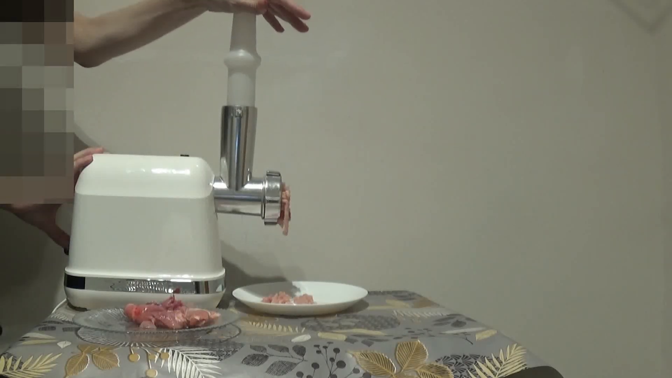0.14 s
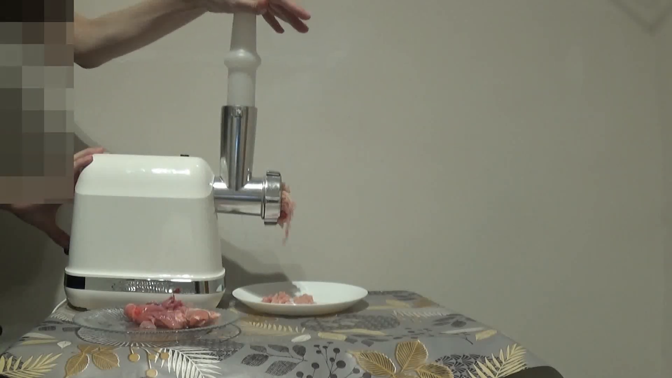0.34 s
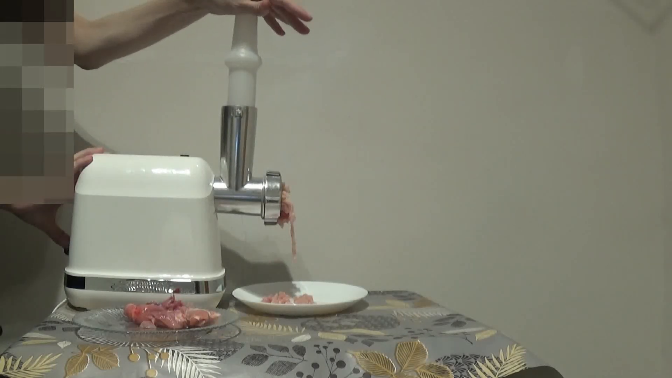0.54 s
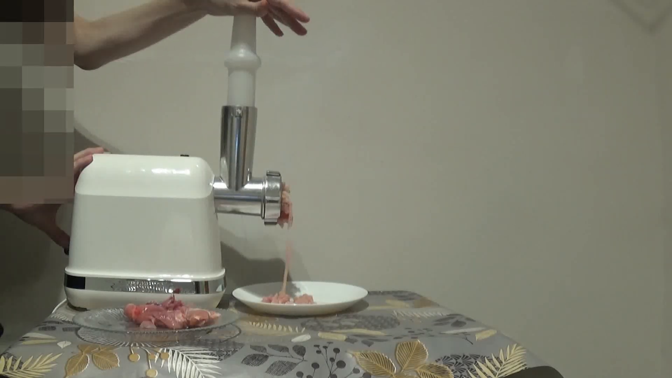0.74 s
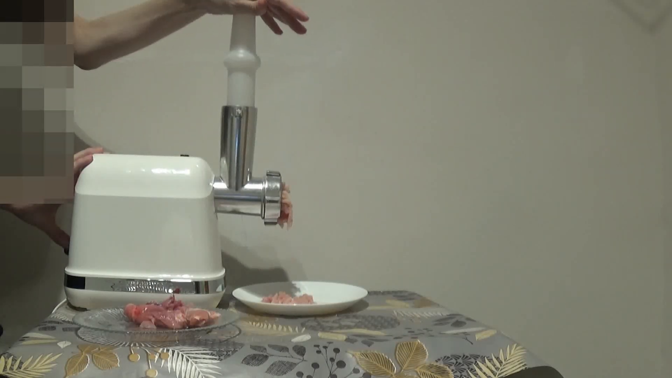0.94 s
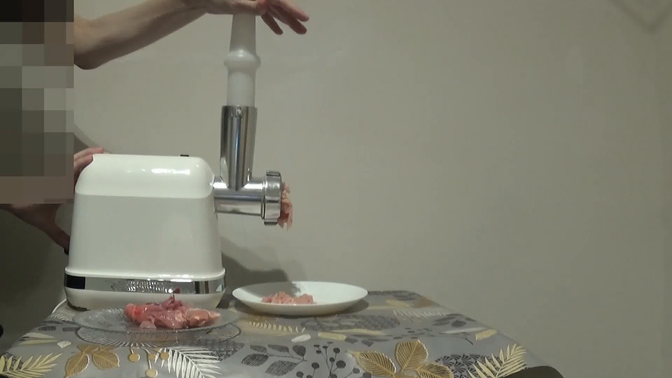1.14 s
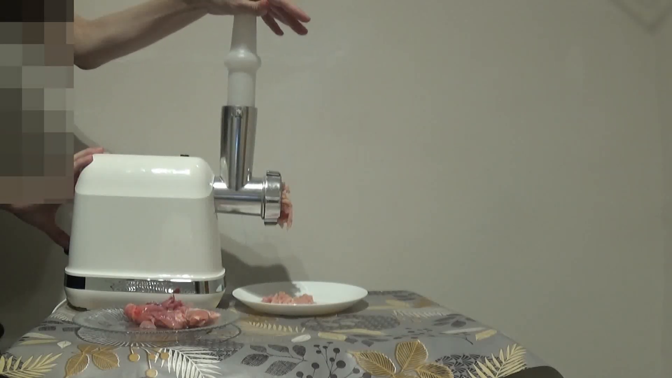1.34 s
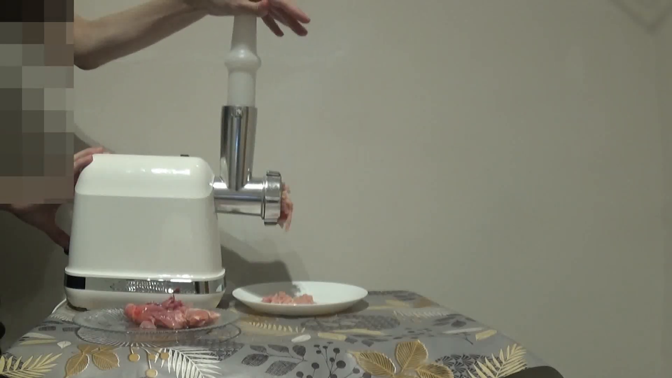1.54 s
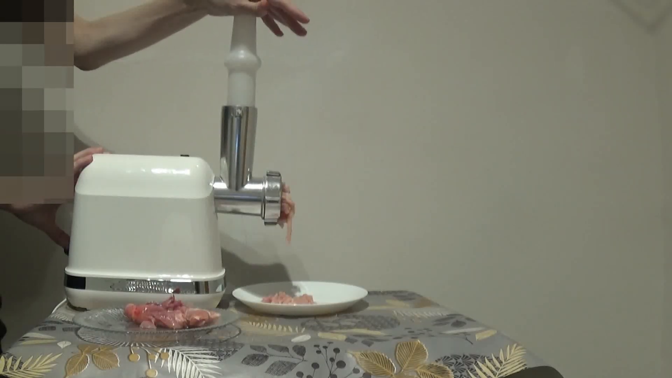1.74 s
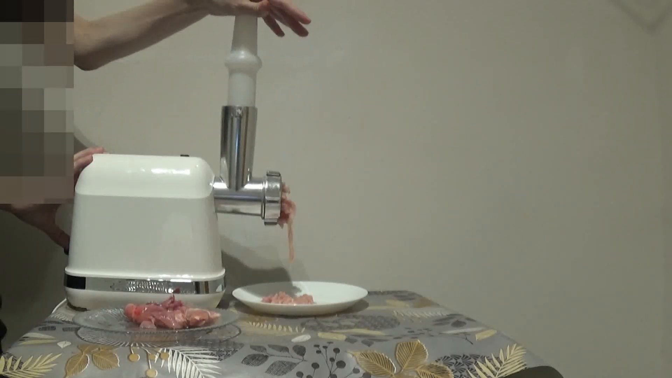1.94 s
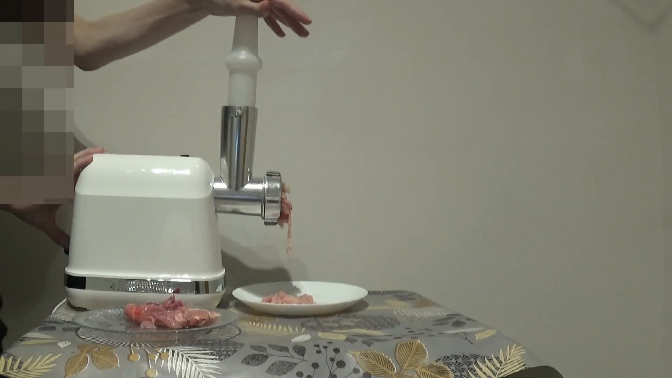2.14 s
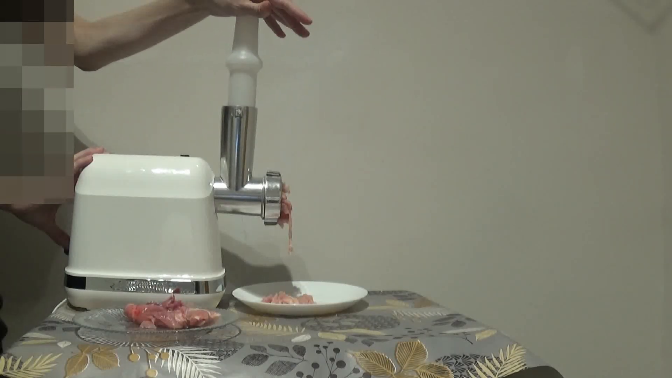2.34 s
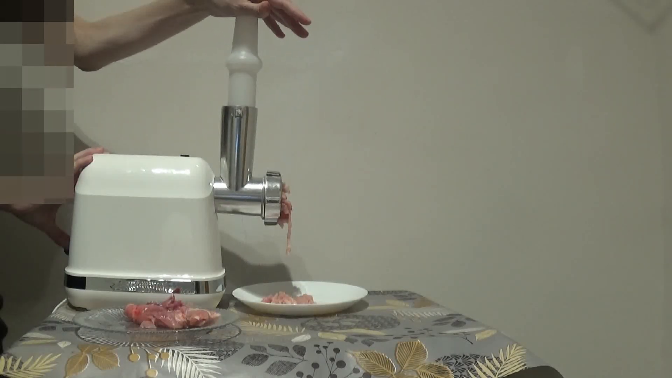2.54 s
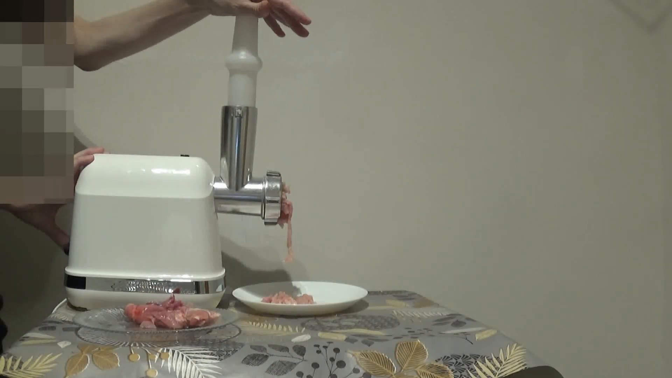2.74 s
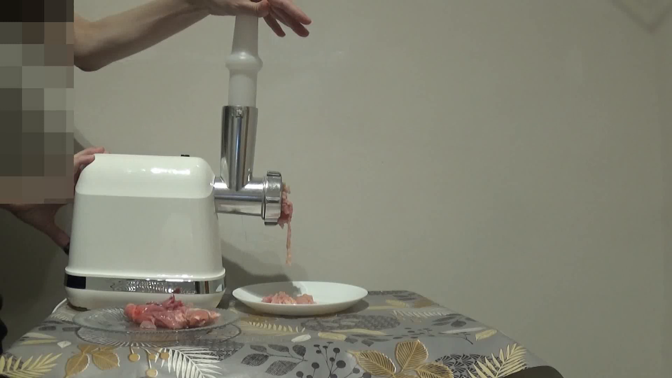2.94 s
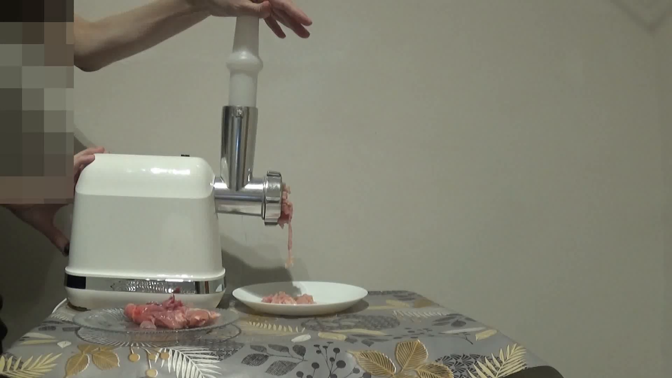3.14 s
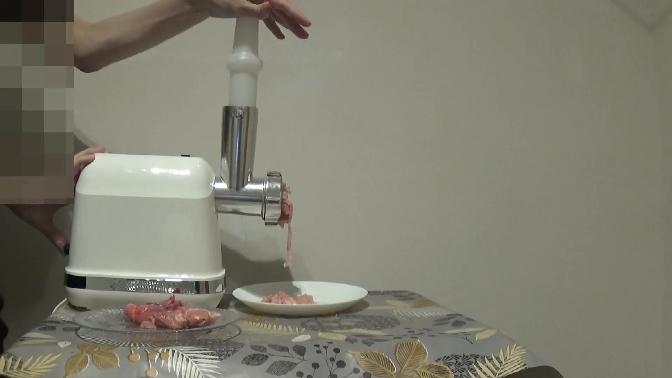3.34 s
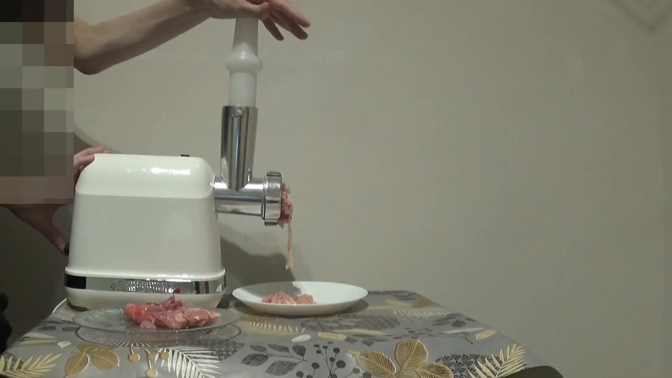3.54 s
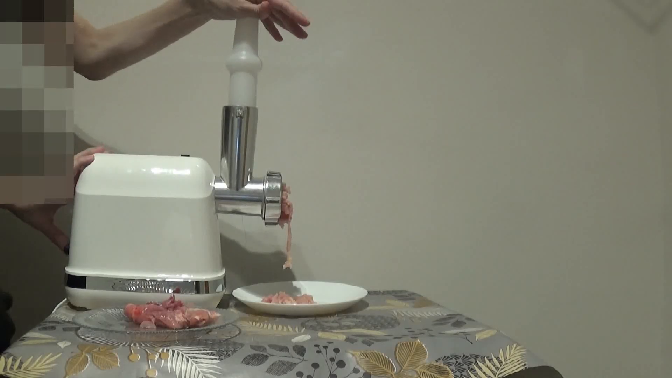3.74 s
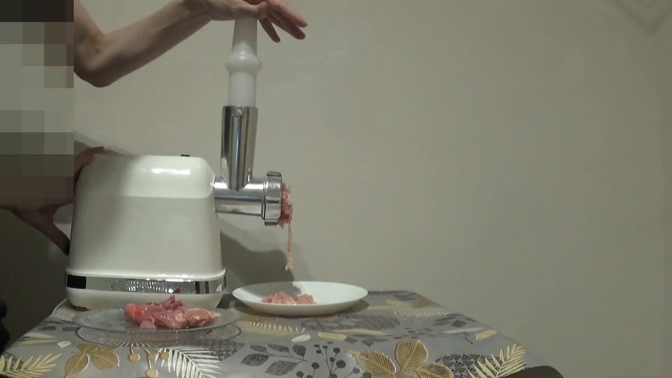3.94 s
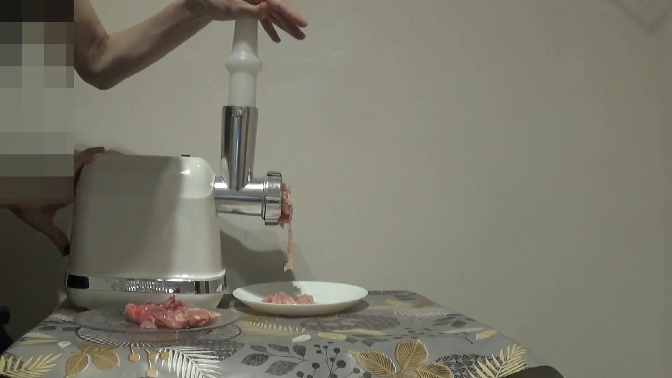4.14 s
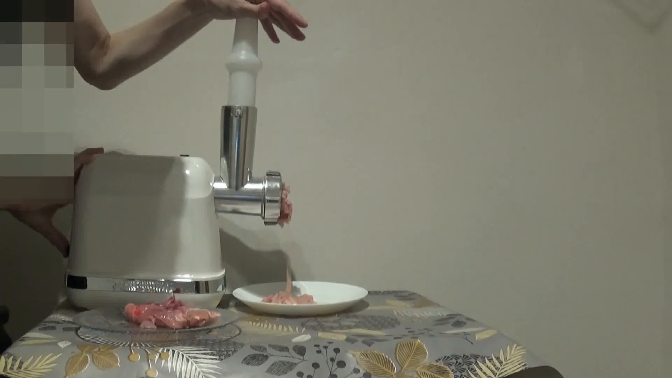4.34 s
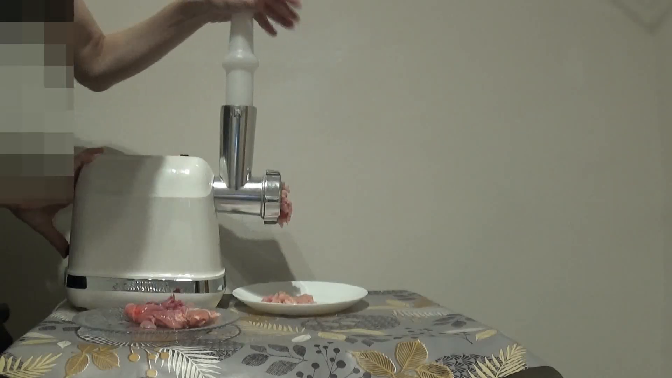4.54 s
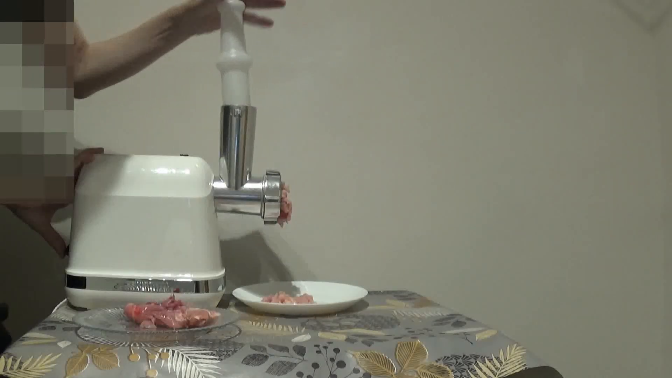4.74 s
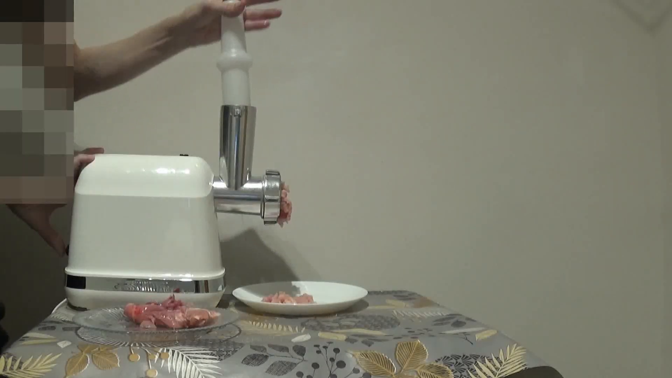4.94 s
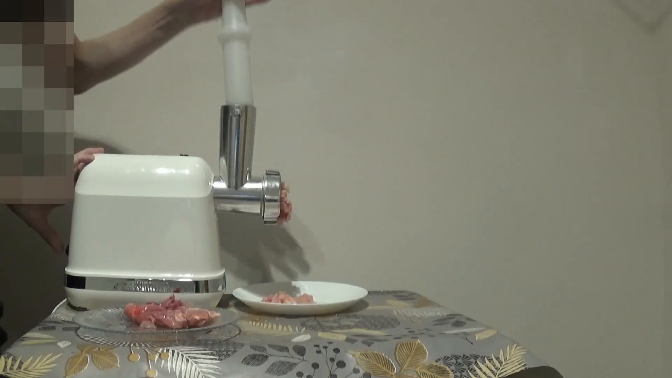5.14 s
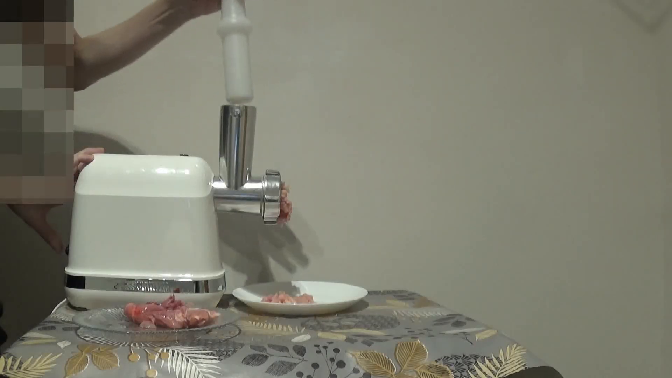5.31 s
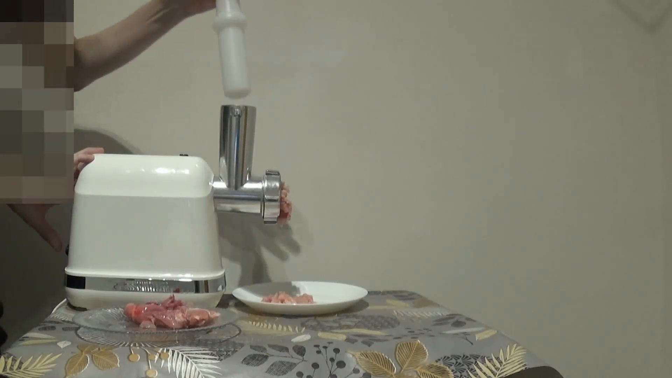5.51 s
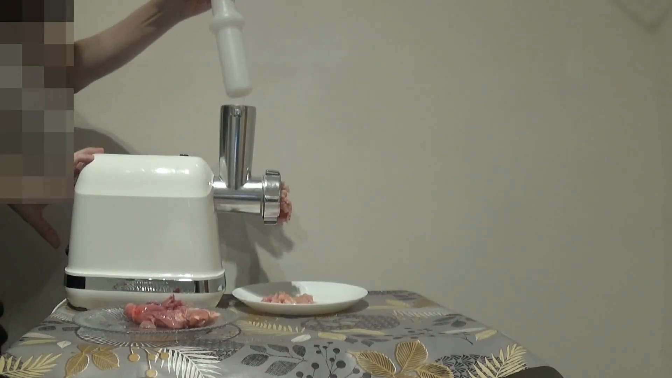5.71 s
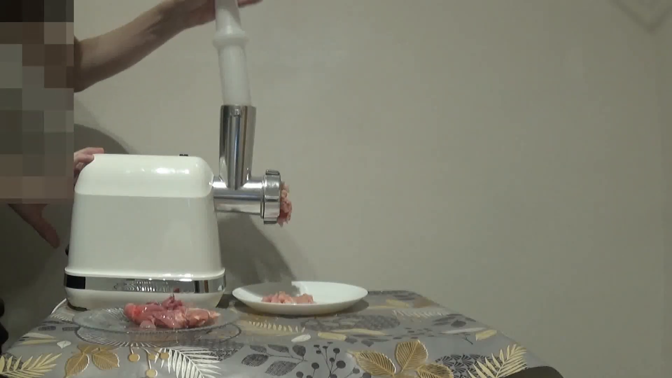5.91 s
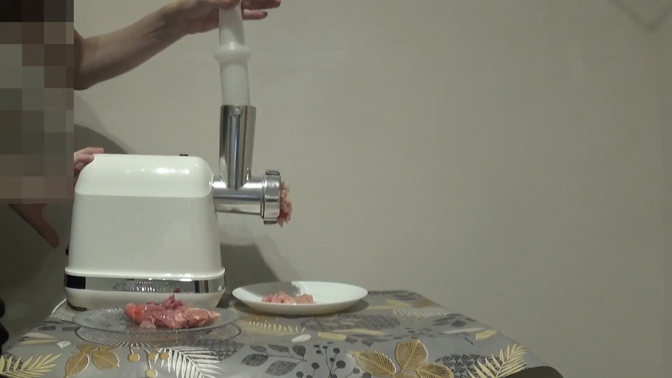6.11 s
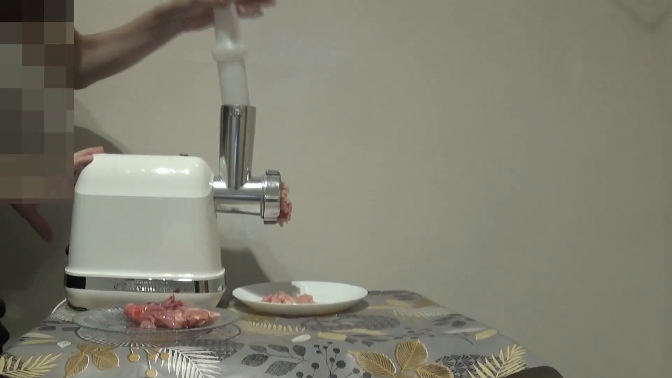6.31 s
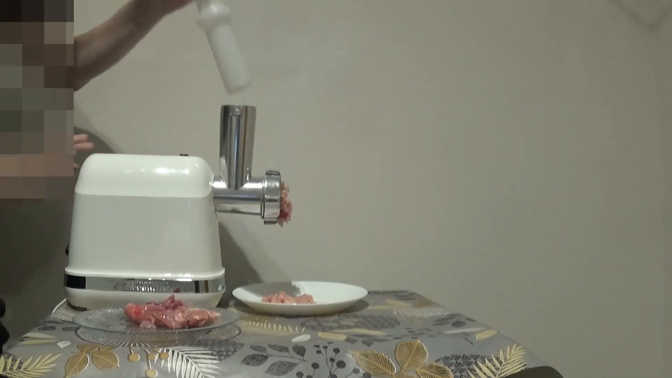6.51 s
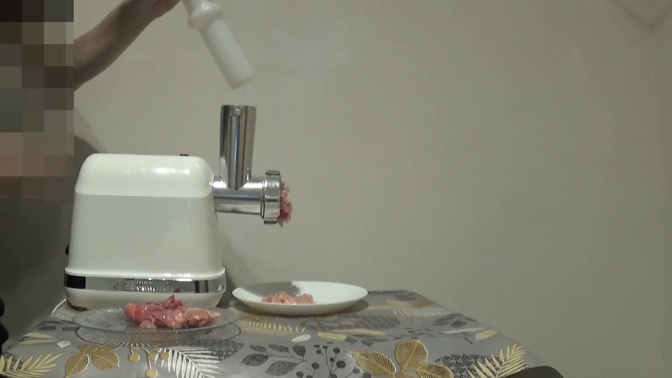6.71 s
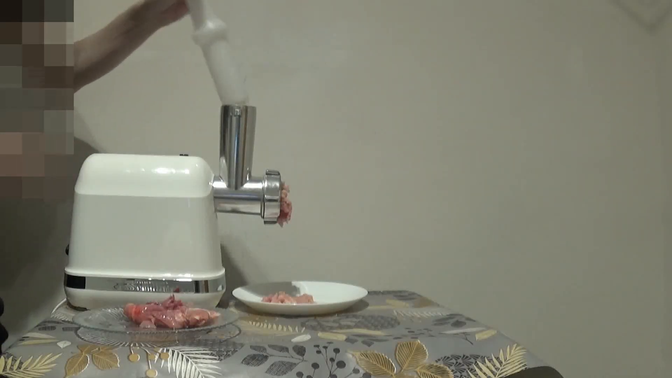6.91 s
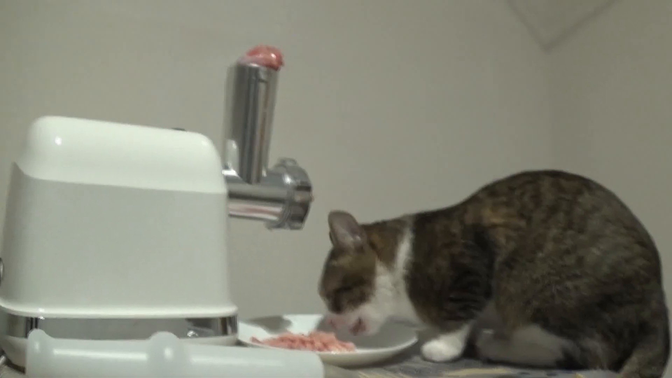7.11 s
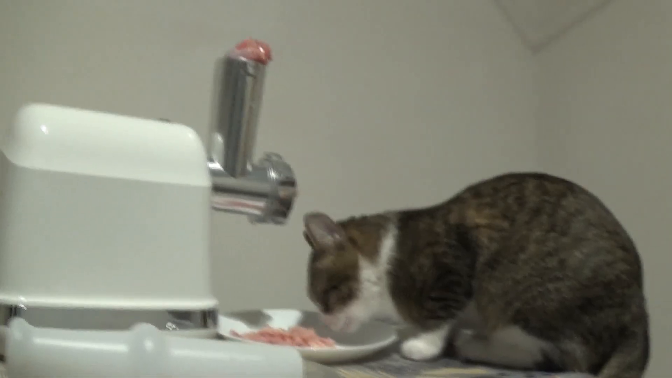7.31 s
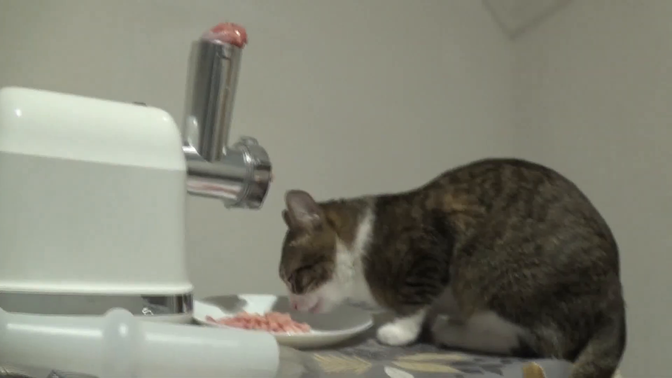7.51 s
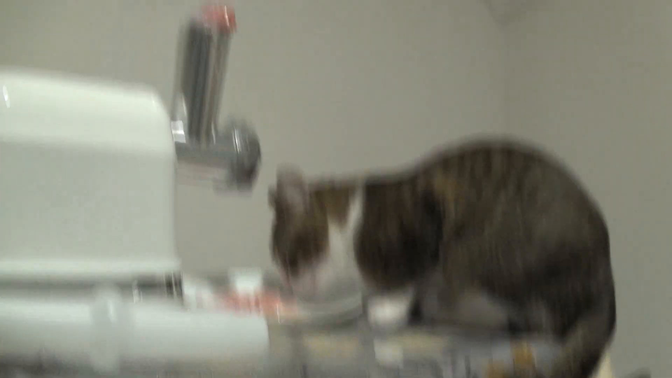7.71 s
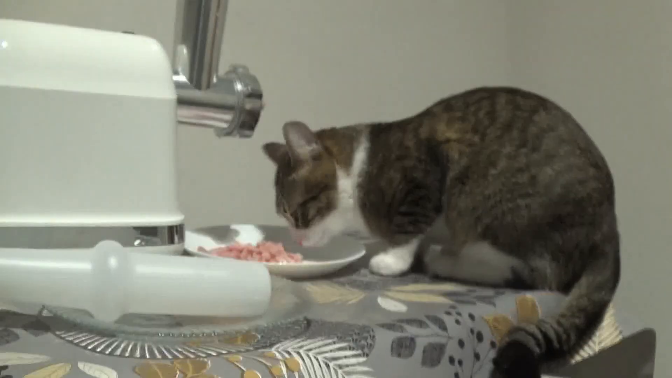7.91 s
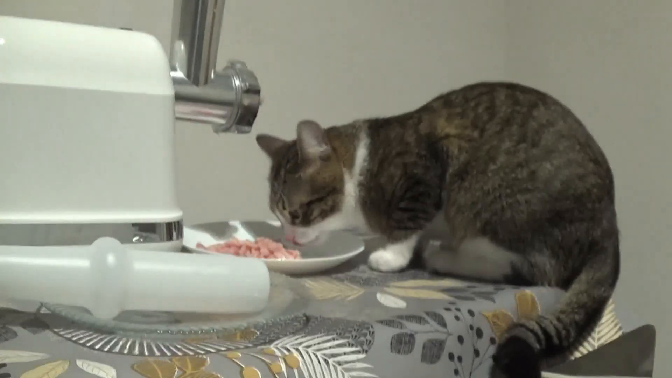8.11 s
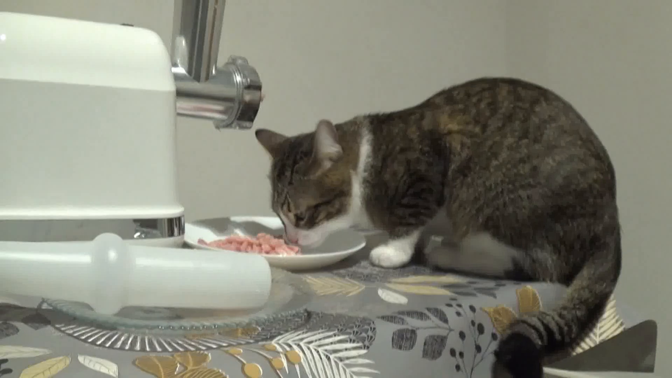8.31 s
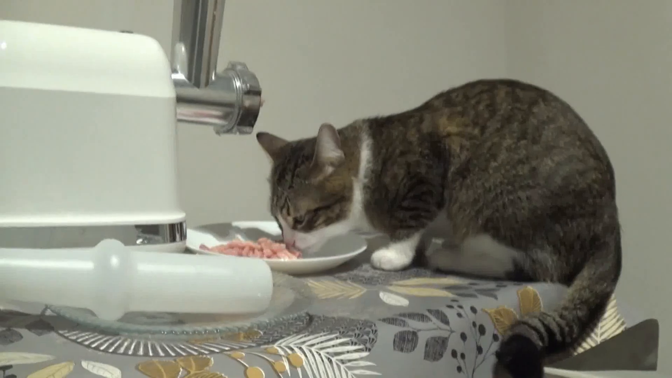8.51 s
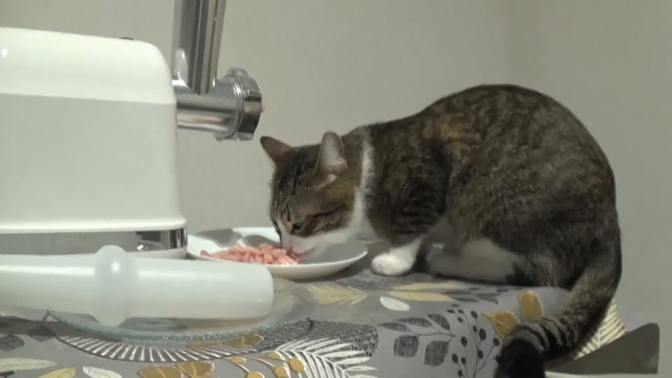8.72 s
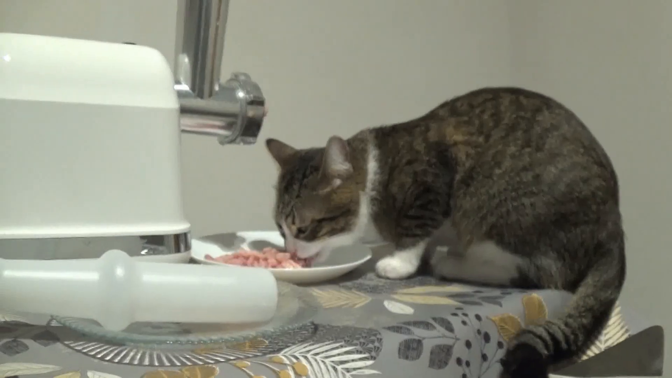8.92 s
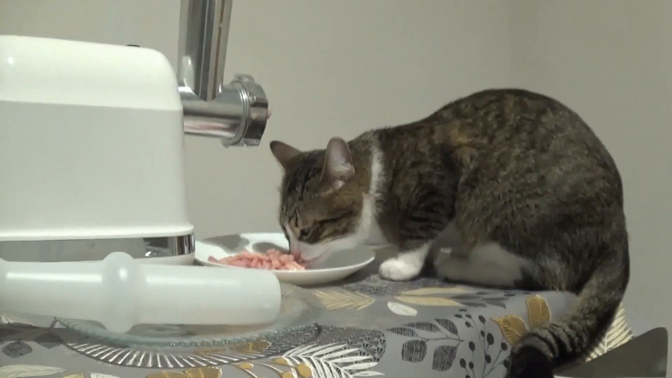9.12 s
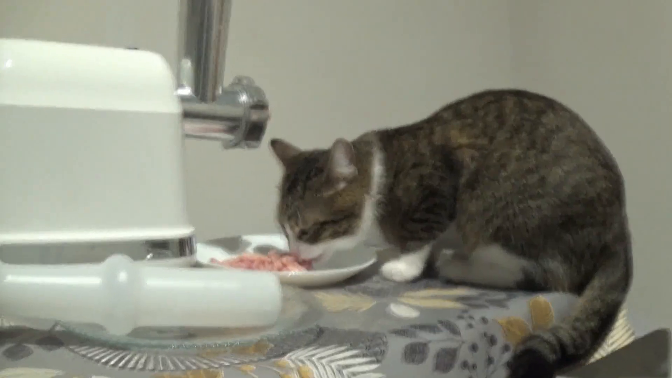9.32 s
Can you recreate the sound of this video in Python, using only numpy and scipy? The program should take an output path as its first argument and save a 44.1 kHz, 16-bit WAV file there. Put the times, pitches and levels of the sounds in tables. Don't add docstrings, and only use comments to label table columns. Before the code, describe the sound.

A rough grinder motor fills the first four seconds, its tone easing slightly as the meat load lightens, then falls in pitch and rattles to a halt. One hollow plastic knock with small rebounds, dry scraping and light rim taps follow in the quiet kitchen. A short dead gap cuts to close, irregular cat eating: wet smacks, crisp saliva clicks, a pause, plate nudges on cloth and more eager licking.

```python
import sys
import numpy as np
from scipy import signal
from scipy.fft import rfft, irfft, next_fast_len
from scipy.io import wavfile
from scipy.ndimage import map_coordinates

SR = 44100
rng = np.random.default_rng(int(sys.argv[2]) if len(sys.argv) > 2 else 0)


def convert_level_to_amplitude(level_db):
    exponent = np.asarray(level_db, float) / 20
    return 10 ** exponent


def master(y):
    cut = np.clip(np.atleast_2d(y).T, -1, 1)
    pcm = np.round(cut * 32767)
    wavfile.write(sys.argv[1], SR, pcm.astype(np.int16))


N = 417186
TIME = np.arange(N) / SR
GEAR = 16 / 13
FREE_TURNS = 323.4
SILENT_S, BACK_S = 7.002, 7.062

# (time [s], peak [dB], mouth resonance [Hz], edge [dB])
SMACKS = [(7.095, -31.5, 1000, -9), (7.193, -49, 800, -6), (7.21, -35.5, 1300, -4.5),
          (7.26, -48, 2300, -10), (9.304, -44.5, 1000, -4), (7.375, -37.5, 800, -9), (7.411, -43, 640, -4),
          (7.446, -48, 880, -12), (7.487, -42.5, 760, -3), (7.533, -42, 950, 0), (7.621, -34.5, 850, -13),
          (7.648, -30, 680, 2), (7.665, -24, 800, -3), (7.6856, -24.5, 1670, -10), (7.763, -44, 646, -12),
          (7.841, -46, 716, -6), (7.88, -49, 751, -8), (7.938, -36, 884, -5), (8.256, -37.5, 1130, -2),
          (8.353, -44, 760, -10), (8.394, -32, 1850, -5), (8.456, -42, 1200, 5), (8.522, -37, 646, -8),
          (8.588, -43, 700, 4), (8.721, -48, 2050, -4), (8.756, -45, 762, -11), (9.014, -44, 800, -6),
          (9.226, -37.5, 950, -1), (9.24, -38, 1570, 5.5), (9.312, -38, 710, -8), (8.146, -50, 1300, -3),
          (8.67, -50, 1100, -3), (9.417, -45, 1500, -4)]


def grinder():
    # (time [s], level [dB])
    gear_levels = [(0, -17.5), (4.2, -17.5), (4.3, -15.5), (4.46, -15.5), (4.75, -15.5), (5.08, -16.5),
                   (5.25, -19.5), (5.278, -18), (5.35, -23.5), (5.41, -29), (5.48, -39.5), (5.55, -52),
                   (5.72, -71.5)]
    # (time [s], first low tone [dB], second low tone [dB], brush contact [dB])
    thrust = [(0, 0.5, -1.5, -1), (.5, -3, -1.5, 0.5), (.7, 1, 0.5, -2.5), (1.25, 2, 3, -4.5),
              (1.45, 0, -0.5, 2.5), (1.9, 1, -0.5, 2.5), (2.5, -1, 0, 1.5), (3.1, -1, 0, 2),
              (3.5, 0, 0.5, 1.5), (3.7, -0.5, -5.5, -3), (4.0, -1, -1.5, 0), (4.2, -2.5, 2.5, -3.5),
              (4.3, -2, -1, 2), (4.4, 2, -1.5, 0)]
    # (frequency [Hz], level difference [dB])
    lean = [(60, 0.15), (170, 0.0), (510, 1.6), (1480, 0), (4310, 0.24), (12600, 1)]
    speed, load, coasting = armature()
    speed = speed * (1 + .0008 * wobble(14))
    turns = np.cumsum(speed) / SR
    rattle_db, = curves(gear_levels, outside=-120)
    *low_db, contact_db = curves(thrust)
    sound = housing_noise(speed, turns, coasting, rattle_db)
    sound += gear_tones(speed, turns, load, coasting, rattle_db, low_db)
    sound += brushes(speed, turns, coasting, contact_db)
    return filtered(sound, lambda f: convert_level_to_amplitude(along(lean, f) * [[.5], [-.5]]))


def armature():
    # (time [s], load [share])
    meat = [
        (0, 1),
        (.7, 1),
        (1.25, .8),
        (1.5, 0),
        (3.4, 0),
        (3.9, -.3),
        (4.25, -.3),
        (4.31, -.1),
    ]
    off_s, release_s = 4.25, .06
    sag_turns, creep_turns_per_s = 3.6, .45
    drag_per_s, friction_turns = .7614, 200
    load = np.interp(TIME, *np.transpose(meat))
    driven = FREE_TURNS + creep_turns_per_s * np.minimum(TIME, off_s) - sag_turns * load
    since = np.maximum(TIME - off_s, 0)
    slowing = (driven + friction_turns) * np.exp(-drag_per_s * since) - friction_turns
    return np.maximum(slowing, 1), load, np.minimum(since / release_s, 1)


def housing_noise(speed, turns, coasting, rattle_db):
    # (frequency [Hz], density [dB per Hz])
    rattle_shape = [(290, -47), (500, -9), (727, -2), (850, -1), (1220, 3), (1540, -3), (2330, 1.5),
                    (2900, -6), (3640, -11), (3960, -11), (6000, -15.5), (7800, -34.5), (13200, -120)]
    # (frequency [Hz], density [dB per Hz])
    hiss_shape = [(1760, -31.5), (3000, 0), (3780, -7), (4180, -6.5), (5170, -9), (7380, -8.5), (7560, -9),
                  (8660, -7), (9520, -7.5), (11100, -10.5), (12400, -19), (16100, -46.5), (22000, -120)]
    # (frequency [Hz], width [Hz], gain [dB])
    housing = [(1116, 30, 1), (1254, 27, 3.5), (1675, 153, 6.5), (1980, 21, 6.5), (2300, 17, 4),
               (3757, 53, 10), (6270, 140, 4), (9500, 420, 4)]
    # (frequency [Hz], density [dB per Hz])
    rumble_shape = [(130, -57.5), (220, -21.5), (427, -3.5), (580, -7), (611, -16.5), (638, -18),
                    (700, 4.5), (910, -21), (1540, -120)]
    # (frequency [Hz], density [dB per Hz])
    draught_shape = [(15, -49.5), (25, -7.5), (124, -23.5), (166, 4), (240, -4.5), (310, -33), (530, -120)]
    fan_db, fan_off_db, fan_db_per_decade, fan_slowest = -4.5, -2, 14.5, 30
    table_db, shudder_turns, shudder_slowest = -18.5, 76, 17.5
    dull_hz, dulling = 2300, 0.5
    chatter_hz, chatter_width_hz, chatter_db = 1550, 700, -9.5

    def shell(f):
        return 1 + sum((convert_level_to_amplitude(db) - 1) * abs(resonance(f, hz, width)) ** 2 for hz, width, db in housing)

    hiss_db = rattle_db + fan_db + fan_off_db * coasting
    hiss_db += fan_db_per_decade * np.log10(np.maximum(speed, fan_slowest) / FREE_TURNS)
    hiss_db += .08 * np.minimum(rattle_db + 16.5, 0)
    shudder = (shudder_turns / np.maximum(speed, shudder_slowest)) ** 2
    rumble_db = rattle_db + table_db + 10 * np.log10(1 + shudder)

    rattle = unit(room(rush(lambda f: convert_level_to_amplitude(along(rattle_shape, f)) * shell(f), grain_db=-0.86), -9.0))
    hiss = unit(room(rush(lambda f: convert_level_to_amplitude(along(hiss_shape, f)) * shell(f), grain_db=1.5), -28.5))
    bright_part = filtered(rattle, lambda f: 1 / (1 + (dull_hz / (f + 1)) ** 4))
    rattle = rattle - bright_part * (1 - convert_level_to_amplitude(dulling * np.minimum(rattle_db + 13.5, 0)))
    hiss = hiss * (1 + 0.24 * np.sin(2 * np.pi * turns))
    sound = convert_level_to_amplitude(rattle_db - 0.75) * rattle + convert_level_to_amplitude(hiss_db + 0.63) * hiss

    chatter = rush(lambda f: abs(resonance(f, chatter_hz, chatter_width_hz)) ** 2, grain_db=2.5)
    sound += coasting * (1 - speed / FREE_TURNS) * convert_level_to_amplitude(rattle_db + chatter_db) * chatter
    sound += convert_level_to_amplitude(rumble_db + 1.0) * rush(lambda f: convert_level_to_amplitude(along(rumble_shape, f)))
    sound += convert_level_to_amplitude(0.87 * hiss_db - 44.5) * rush(lambda f: convert_level_to_amplitude(along(draught_shape, f)))
    return sound


def gear_tones(speed, turns, load, coasting, rattle_db, low_db):
    # (multiple of armature speed [ratio], loaded [dB], free [dB])
    shaft = [(1.004, -51, -40), (2.003, -32, -28.5), (2.297, -38.5, -42.5), (2.998, -50.5, -37),
             (3.47, -37, -42.5), (3.927, -36.5, -41.5), (7, -42.5, -37.5), (7.09, -46, -39.5),
             (7.996, -30.5, -32), (9, -48.5, -35.5), (10, -37, -33.5), (11.52, -39.5, -48.5),
             (12, -43.5, -39.5), (15, -51, -40), (15.98, -40, -42.5), (17.03, -43, -52),
             (17.7, -45.5, -54.5), (19.06, -45, -44.5), (20, -54, -47.5), (25, -42, -51.5),
             (32.04, -32, -51.5), (33, -38.5, -37.5), (33.9, -54, -43), (36.06, -42.5, -51.5)]
    # (multiple of mesh rate [ratio], loaded [dB], free [dB])
    mesh = [(2, -39, -29), (3, -40.5, -37), (4, -27, -33.5), (4.5, -34.5, -37.5), (5, -37, -35),
            (5.5, -41.5, -38.5), (6, -27, -31), (8, -49.5, -53.5), (9.5, -45.5, -43.5),
            (1.1, -44, -57)]
    # (time [s], four levels [dB])
    bearing = [(0, 2, -0.5, 0.5, -8.5), (.3, 2.5, 0.5, -3, -5.5), (.45, 5, -3.5, 4, -5),
               (.65, 0.5, 2, 0.5, -1), (.9, -2, 1, 0.5, 1.5), (1.3, -2.5, -0.5, -1.5, 1),
               (1.6, 0.5, 1, 2, -7), (2.2, -1.5, -1.5, 2, -7), (2.6, -0.5, -6, -2.5, 5.5),
               (3.0, 1, 3.5, -9, 3), (3.15, -3, -2, 5, -7), (3.4, 3, -1, -2, 4.5), (3.8, 3, 0, -1, 0.5),
               (4.2, -2, 2.5, -1, -10)]
    wheels = [6 * GEAR, 4 * GEAR, 8, 10.01, 2.005, 2 * GEAR]
    # (frequency [Hz], level [dB])
    radiate = [(125, -42), (165, -15), (205, -22), (255, -4), (290, -7), (320, 0)]
    # (frequency [Hz], level [dB])
    slack = [(380, -28), (520, -8), (800, -12), (1250, -3), (1800, -10), (3000, -18)]
    pressures = list(zip(wheels, curves(bearing) + low_db))
    sound = np.zeros((2, N))
    for k, loaded_db, free_db in shaft + [(k * GEAR, a, b) for k, a, b in mesh]:
        pressed = [db for wheel, db in pressures if abs(k / wheel - 1) < .012]
        level_db = free_db + load * (loaded_db - free_db) + sum(pressed)
        level_db = level_db + coasting * along(slack, k * speed) * (k > 1.5)
        level_db = level_db + along(radiate, k * speed) + rattle_db + 17.0 - 5 * (k > 30.5)
        unsteady_db = (.4 if pressed else 1) * (1.8 + .04 * k)
        sound += tone(k * turns, level_db + unsteady_db * wobble(6.3))
    return sound


def brushes(speed, turns, coasting, contact_db):
    # (frequency [Hz], level [dB])
    holder = [(6000, -34), (6800, -9), (7200, 2), (7800, 1), (8500, 1), (9300, 2), (10300, 5.5),
              (11300, -4), (12400, -3)]
    bar_shape_db = [0, 0.5, 1.5, -1, 0, 0, 0.976, 1, 1, 1, 1, 1]
    bars, brush_db, knee_turns = 24, -34.5, 130
    click_db = brush_db - 10 * np.log10(1 + (knee_turns / speed) ** 5)
    runout = 1 + 0.26 * np.sin(2 * np.pi * turns * GEAR / 4)
    sound = np.zeros((2, N))
    for k in np.arange(12) + 1:
        hz = k * bars * speed
        level_db = click_db + bar_shape_db[k - 1] + contact_db * (k == 1) + along(holder, hz)
        level_db = level_db - 1.5 * coasting + (1.2 + 1.2 * coasting) * wobble(30)
        sound += runout * np.clip(15 - hz / 1000, 0, 1) * tone(k * bars * turns, level_db, spread=.15)
    return sound


def pusher():
    # (time [s], peak [dB], crack [dB])
    hits = [
        (5.853, -14, -13.5),
        (5.904, -28, -10),
        (5.944, -33.5, -7.5),
    ]
    # (frequency [Hz], level [dB], t60 [s])
    tube = [(800, -5, 0.084), (1000, -17, 0.35), (1440, -21, 0.14), (1780, 5, 0.053), (2090, -12, 0.22),
            (2710, -29, 0.4), (2930, -19, 0.015), (3150, -8, 0.077), (3400, -31.5, 0.083)]
    # (time [s], peak [dB], centre [Hz])
    catches = [(6.304, -46, 1200), (6.314, -44, 6500), (6.334, -41, 6500), (6.347, -40, 4500),
               (6.385, -33, 6420), (6.397, -47, 6800), (6.413, -35, 7750), (6.414, -40, 4900),
               (6.426, -40, 3500), (6.534, -40.5, 3000), (6.538, -50, 1600)]
    # (start [s], length [s], frequency [Hz], level [dB])
    squeaks = [(5.853, 0.042, 1660, -44), (5.855, .06, 750, -44), (5.857, .04, 2130, -45),
               (5.856, 0.08, 1100, -50), (5.859, .05, 5800, -54), (5.897, .07, 1700, -50),
               (5.87, 0.26, 3130, -56.5), (5.893, 0.066, 4800, -55), (5.922, 0.234, 2200, -61.5),
               (5.959, 0.11, 7100, -57), (5.99, 0.082, 6500, -55), (6.053, .06, 4390, -55),
               (5.958, 0.128, 9400, -65), (6.31, 0.066, 7900, -57), (6.314, 0.096, 9260, -57.5),
               (6.33, .05, 4300, -53), (6.317, 0.083, 3150, -56), (6.32, .08, 6500, -57),
               (6.4, 0.05, 7650, -57), (6.403, 0.044, 4860, -57)]
    # (start [s], lift [s], level [dB], tube body [dB])
    slides = [
        (5.853, 6.078, -54, 13.5),
        (6.299, 6.416, -51.5, -3),
        (6.921, 7.006, -60, 10),
    ]
    knocks, t = np.zeros(N), TIME[:SR // 4]
    for s, db, crack_db in hits:
        ring = np.zeros(len(t))
        for hz, level, t60 in tube:
            ring += convert_level_to_amplitude(level + rng.normal(0, 1.4) - 60 * t / min(t60, .09)) * np.sin(2 * np.pi * hz * t)
        thud = convert_level_to_amplitude(db - 13) * ring + convert_level_to_amplitude(db - 9.0) * burst(t, 1240, 1200, 0.092)
        add(knocks, s, thud + convert_level_to_amplitude(db + crack_db + 7.5) * burst(t, 5500, 7600, 0.019))
    for s, db, hz in catches:
        add(knocks, s, convert_level_to_amplitude(db) * burst(t, hz, .6 * hz, 0.01))
    for s, length, hz, db in squeaks:
        add(knocks, s, convert_level_to_amplitude(db) * rub(length, hz, 320))
    high = rush(lambda f: 1. * (f > 2000), grain_db=2.5)
    low = rush(lambda f: abs(resonance(f, 670, 1150)) ** 2, grain_db=2.0)
    scrape = np.zeros((2, N))
    for row in slides:
        slide, body = stroke(*row)
        scrape += slide * (convert_level_to_amplitude(4.5) * high + body * low)
    return room(np.array([knocks, knocks]), -4.5) + scrape


def stroke(start, lift, db, body_db):
    bite_s, lift_s, edge_db = .03, 0.073, -11.5
    shape = [(start, edge_db), (start + bite_s, 0), (lift, 0), (lift + lift_s, edge_db)]
    shape_db, = curves(shape, outside=-120)
    return convert_level_to_amplitude(db + shape_db), convert_level_to_amplitude(body_db - 64.5 * np.clip(TIME - start, 0, 1))


def cat():
    # (start [s], length [s], frequency [Hz], width [Hz], level [dB])
    scuffs = [(8.715, .035, 2500, 4000, -56), (8.872, 0.062, 8940, 1500, -54),
              (8.41, 0.03, 800, 500, -58.5), (8.462, .022, 730, 300, -57), (7.412, .02, 700, 400, -54),
              (7.492, .016, 870, 500, -54), (7.565, .02, 750, 400, -57), (7.868, .03, 800, 500, -57),
              (7.952, .024, 700, 400, -53), (9.43, .025, 480, 350, -52), (8.914, .01, 4100, 3000, -46),
              (8.928, 0.027, 1100, 900, -56), (9.02, 0.019, 840, 700, -58), (10, 0.026, 830, 600, -52),
              (9.225, 0.024, 760, 700, -48), (9.396, .03, 1300, 2000, -54), (9.32, .08, 10000, 3000, -60.5),
              (8.36, 0.029, 800, 500, -59.5), (9.194, .018, 900, 450, -50), (7.686, .012, 950, 400, -49),
              (8.393, .014, 750, 500, -55), (9.344, .014, 750, 400, -55), (8.94, .016, 1100, 600, -56)]
    near = np.zeros(N)
    contacts(near)
    wet_threads(near)
    for s, length, hz, width, db in scuffs:
        add(near, s, convert_level_to_amplitude(db) * rub(length, hz, width))
    aside = convert_level_to_amplitude(-15) * np.roll(near, 31)
    return room(np.array([near + aside, near - aside]), -15.5) + lapping()


def contacts(track):
    # (time [s], peak [dB], ring [Hz])
    clatter = [(8.73, -49.5, 900), (8.873, -37, 900), (8.8775, -28, 870), (8.882, -30, 920),
               (8.891, -27, 915), (8.895, -31, 980), (8.907, -40, 800), (8.922, -32, 900),
               (8.935, -44.5, 845), (8.969, -46, 1880), (8.987, -46, 1350), (9.18, -35, 800),
               (9.312, -38, 1900), (9.344, -53, 681), (9.417, -44, 880)]
    # (time [s], peak [dB], ring [Hz])
    taps = [
        (6.922, -37, 800),
        (6.939, -41, 700),
    ]
    plate_edge_db, heavy_hz = -5, 800
    t = TIME[:SR // 12]
    touches = [(*row, 0.032, -22) for row in SMACKS]
    touches += [(*row, plate_edge_db, 0.035, -9.5) for row in clatter]
    touches += [(*row, plate_edge_db, .035, -29) for row in taps]
    for s, db, hz, edge_db, t60, heavy_db in touches:
        thump_db = heavy_db - 21 * max(np.log2(hz / heavy_hz), 0)
        thump = np.sin(2 * np.pi * rng.uniform(98, 233) * t)
        thump = thump * convert_level_to_amplitude(-60 * t / 0.07) * np.minimum(t / 0.0025, 1)
        mouth = burst(t, hz, 0.58 * hz, t60) + convert_level_to_amplitude(edge_db) * burst(t, 2400, 2510, 0.8 * t60)
        add(track, s, convert_level_to_amplitude(db - 1.5) * mouth + convert_level_to_amplitude(db + thump_db + 10.5) * thump)
    for s, db, _ in clatter:
        add(track, s, convert_level_to_amplitude(db - 8) * burst(t, 3700, 770, 0.025))


def wet_threads(track):
    # (time [s], peak [dB], centre [Hz])
    snaps = [(7.117, -39.5, 5200), (7.1867, -38, 9160), (7.2095, -35, 9530), (7.2436, -30, 9200),
             (7.256, -40, 10200), (7.3995, -41, 6500), (7.6477, -28, 4910), (7.708, -49, 9000),
             (7.713, -51, 6500), (7.721, -47.5, 6500), (7.735, -48, 9800), (7.748, -50, 4500),
             (8.596, -42.5, 9000), (8.7196, -46.5, 9000), (9.193, -48, 8500), (7.664, -25, 2300),
             (7.2095, -43, 2300), (7.3264, -49.5, 6210), (7.3963, -39, 7970), (7.409, -43, 8500),
             (7.4148, -37, 8320), (7.6033, -47.5, 8990), (7.664, -14.5, 9600), (7.6863, -33, 8950),
             (7.7255, -39.5, 9790), (7.7619, -47, 8010), (7.937, -37, 6500), (7.9814, -40, 10100),
             (8.0667, -46, 6740), (8.175, -44.5, 8770), (8.3012, -51.5, 4820), (8.6374, -36.5, 8800),
             (8.6694, -47.5, 10000), (8.7791, -41, 9340), (8.832, -45, 5000), (8.8769, -29, 8560),
             (8.9215, -30, 2000), (8.832, -43.5, 9500), (8.9687, -33, 10300), (9.075, -38, 9060),
             (9.1792, -39.5, 9240), (9.224, -23.5, 8500), (9.3036, -36, 8790), (9.3112, -36, 7500),
             (9.3434, -36.5, 10500)]
    stretch_s = .001
    t = TIME[:SR // 12]
    threads = [(s, db - 10 + 0.453 * edge_db, 5000) for s, db, _, edge_db in SMACKS]
    for s, db, hz in snaps + threads:
        add(track, s + stretch_s, convert_level_to_amplitude(db + 1.5) * burst(t, hz, .65 * hz, .0035))


def lapping():
    # (time [s], eagerness [dB])
    eagerness = [
        (7.08, -66.5),
        (7.54, -65),
        (8.11, -90),
        (8.35, -75),
        (8.89, -67),
        (9.02, -86),
        (9.22, -57.5),
        (9.37, -50.5),
        (9.46, -55.5),
    ]
    # (time [s], level [dB])
    shuffle = [
        (7.1, -91.5),
        (7.6, -80),
        (8.15, -91),
        (8.9, -82),
        (9.1, -89),
        (9.25, -70),
        (9.38, -76.5),
        (9.46, -58.5),
    ]
    wet_db, = curves(eagerness, outside=-120)
    shuffle_db, = curves(shuffle, outside=-120)
    wet = rush(lambda f: abs(resonance(f, 800, 1200)) ** 1.5, grain_db=4.5)
    fizz = rush(lambda f: abs(resonance(f, 6450, 13000)) ** 1.3, grain_db=1.5)
    table = convert_level_to_amplitude(shuffle_db + 15.5) * rush(lambda f: abs(resonance(f, 75, 110)) ** 2)
    return table + convert_level_to_amplitude(wet_db - 2.0) * wet + convert_level_to_amplitude(wet_db - 5.5) * fizz


def paws():
    # (time [s], peak [dB], frequency [Hz])
    steps = [(7.19, -66, 150), (7.32, -59, 200), (7.41, -58.5, 220), (7.48, -62, 140), (7.56, -63, 200),
             (7.648, -50, 300), (7.665, -51, 300), (7.77, -66, 110), (7.84, -63, 200), (7.938, -54, 350),
             (8.48, -62, 130), (8.52, -60.5, 250), (8.76, -63, 130), (8.874, -52, 220), (8.885, -59, 130),
             (9.22, -55, 260), (9.23, -53.5, 130), (9.29, -62, 100), (9.4, -60, 70)]
    pushes, t = np.zeros(N), TIME[:SR // 8]
    for s, db, hz in steps:
        fade = convert_level_to_amplitude(db + 3 - 60 * t / 0.093) * np.minimum(t / 0.0051, 1)
        add(pushes, s, fade * np.sin(2 * np.pi * hz * t))
    return pushes


def kitchen():
    # (frequency [Hz], density [dB per Hz])
    air = [(15, -56.5), (25, -45), (390, -10.5), (433, -17.5), (578, -12.5), (641, -9), (901, -15),
           (2440, -18), (2930, -9.5), (3250, -19.5), (9750, -24), (12000, -25), (13000, -39)]
    # (frequency [Hz], before the scene changes [dB], after [dB])
    fridge = [(50, -95, -95), (99, -86.5, -97), (148, -84.5, -83), (200, -80.5, -85), (444, -71.5, -79),
              (640, -64, -74.5), (3505, -69.5, -92), (2968, -69, -84)]
    # (frequency [Hz], width [Hz], level [dB], share of the swell [ratio])
    whistles = [(2890, 110, -69.5, 1), (710, 90, -79.5, 0.017)]
    # (time [s], whistle [dB], ticking [dB])
    swell = [(5.6, 1, 1), (6.4, -1, -2), (6.9, -2, -9), (7.1, -7, 0), (8.2, -7, 1), (8.5, 2, -1.5),
             (9.46, -3, -1)]
    air_db = -57.5
    later = TIME >= SILENT_S
    sound = convert_level_to_amplitude(air_db - 4) * rush(lambda f: convert_level_to_amplitude(along(air, f)))
    for hz, before_db, after_db in fridge:
        sound += tone(hz * TIME, np.where(later, after_db, before_db) + 1.0 * wobble(3.3))
    whistle_db, tick_db = curves(swell)
    for hz, width, db, share in whistles:
        breath = rush(lambda f: abs(resonance(f, hz, width)) ** 2)
        sound += convert_level_to_amplitude(db + share * whistle_db + 2.0 * wobble(5.4)) * breath
    tick_rate, first_s, tick_hz, half_s = 25, .023, 3480, .004
    since = (TIME - first_s + .5 / tick_rate) % (1 / tick_rate) - .5 / tick_rate
    level = convert_level_to_amplitude(-65 + tick_db + 2 * later + 2.2 * wobble(25))
    return sound + level * np.exp(-.5 * (since / half_s) ** 2) * np.sin(2 * np.pi * tick_hz * since)


def room(x, db):
    # (frequency [Hz], t60 [s])
    decay = [(300, 0.24), (2000, 0.2), (10000, 0.23)]
    hz, t, z = signal.stft(rng.standard_normal((2, SR // 2)), SR, nperseg=256)
    fade = convert_level_to_amplitude(-60 * t / along(decay, hz)[:, None])
    tail = signal.istft(z * fade, SR, nperseg=256)[1]
    late = np.pad(x, ((0, 0), (200, 0)))
    return x + convert_level_to_amplitude(db) * signal.fftconvolve(late, tail / np.linalg.norm(tail[0]), axes=1)[:, :N]


def rush(gain, grain_db=0):
    # (frequency [Hz], side over mid [dB])
    spread = [(60, -11.5), (110, -12), (200, -11.5), (360, -8.5), (640, -8.5), (1170, -5.5), (2110, -4.5),
              (3830, -6), (6930, -4.5), (8500, -11), (9500, -11), (11000, -15.5), (12300, -3)]
    pair = rng.standard_normal((2, N)) * convert_level_to_amplitude(grain_db * wobble(700))

    def mid_side(f):
        return gain(f) * [f ** 0, convert_level_to_amplitude(np.maximum(along(spread, f), -14.5) - 5.0)]

    mid, side = filtered(pair, mid_side)
    return unit(np.array([mid + side, mid - side]))


def tone(turns, db, spread=0.19):
    start, lag = rng.random(), rng.normal(0, spread)
    return np.sqrt(2) * convert_level_to_amplitude(db) * np.sin(2 * np.pi * (turns + start) + [[lag], [-lag]])


def burst(t, hz, width, t60):
    m = 2 * len(t)
    puff = rng.standard_normal(len(t)) * convert_level_to_amplitude(-60 * t / max(t60, .001))
    puff[0] = 0.46 * np.linalg.norm(puff)
    out = irfft(rfft(puff, m) * resonance(np.fft.rfftfreq(m, 1 / SR), hz, width) ** 2, m)[:len(t)]
    return out / np.max(abs(out))


def rub(length, hz, width):
    n = round(length * SR)
    grain_db = 3 * np.repeat(rng.standard_normal(n // 64 + 1), 64)[:n]
    grains = rng.standard_normal(n) * convert_level_to_amplitude(grain_db)
    out = irfft(rfft(grains) * resonance(np.fft.rfftfreq(n, 1 / SR), hz, width) ** 2, n)
    return unit(out) * np.sin(np.pi * np.arange(n) / n) ** 0.49


def resonance(f, hz, width):
    return 1j * f * width / (hz * hz - f * f + 1j * f * width)


def filtered(x, response):
    m = next_fast_len(N + 8192)
    return irfft(rfft(x, m) * response(np.fft.rfftfreq(m, 1 / SR)), m)[..., :N]


def wobble(rate):
    knots = rng.standard_normal(int(N * rate / SR) + 4)
    return map_coordinates(knots, [TIME * rate], order=1)


def curves(rows, outside=None):
    s, *cols = np.transpose(rows)
    return [np.interp(TIME, s, c, outside, outside) for c in cols]


def along(points, hz):
    f, v = np.transpose(points)
    return np.interp(np.log(hz + 1), np.log(f + 1), v)


def unit(x):
    return x / np.sqrt(np.mean(x ** 2) + 1e-20)


def add(track, s, piece):
    part = track[round(s * SR):][:len(piece)]
    part += piece[:len(part)]


def scene():
    # (frequency [Hz], level [dB])
    capsule = [(40, -34), (110, -26.5), (250, -5.5), (500, -0.5), (10000, -1.5), (12000, -6),
               (12700, -23.5), (13200, -64)]
    near = filtered(pusher() + cat(), lambda f: convert_level_to_amplitude(along(capsule, f)))
    return grinder() + near + kitchen() + paws()


def roll_off(x):
    return signal.sosfilt(signal.butter(12, 13150, fs=SR, output="sos"), x)


def record(dry):
    fade_s, top_hz = .026, 12480
    gate = np.where(TIME < SILENT_S, 1, np.clip((TIME - BACK_S) / fade_s, 0, 1) ** 3)
    rounded = dry / (1 + abs(dry / 1.7) ** 4) ** (1 / 4)
    rounded = filtered(rounded, lambda f: np.where(f < top_hz, 1, convert_level_to_amplitude(-38)))
    return roll_off(rounded * gate)


dry = scene()
out = record(dry)
master(out)
```